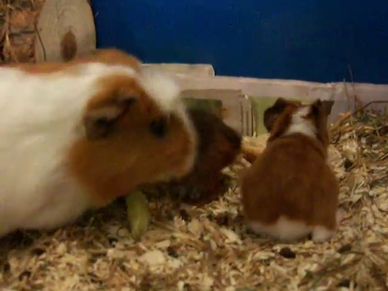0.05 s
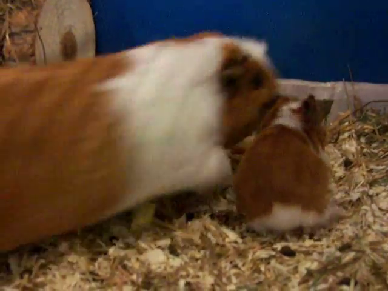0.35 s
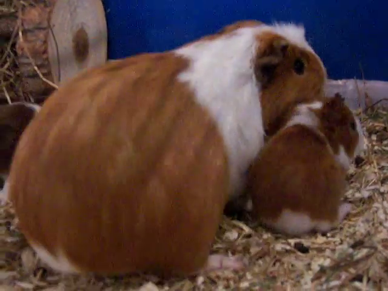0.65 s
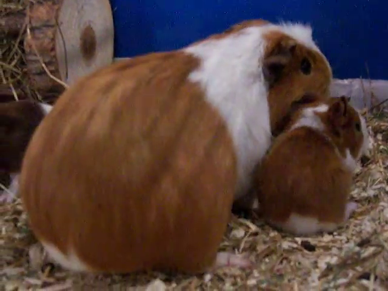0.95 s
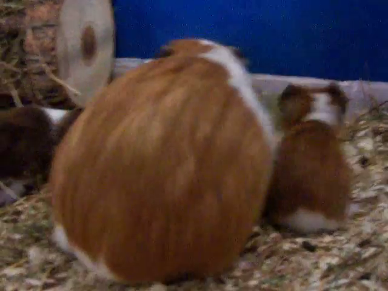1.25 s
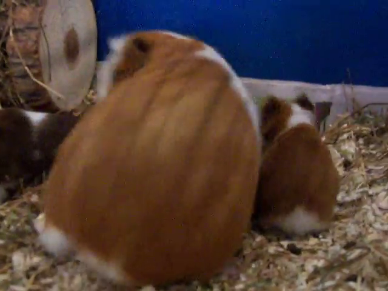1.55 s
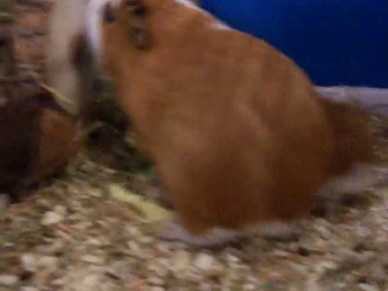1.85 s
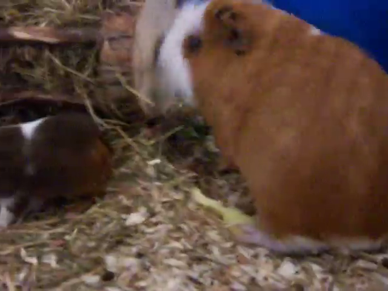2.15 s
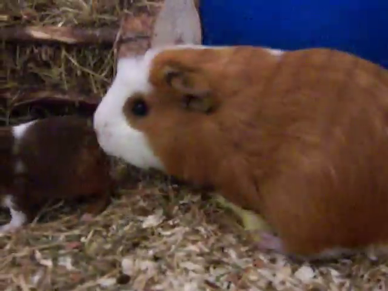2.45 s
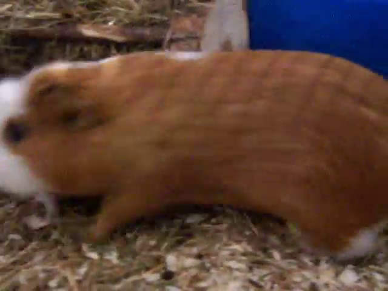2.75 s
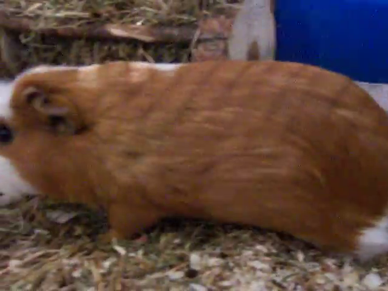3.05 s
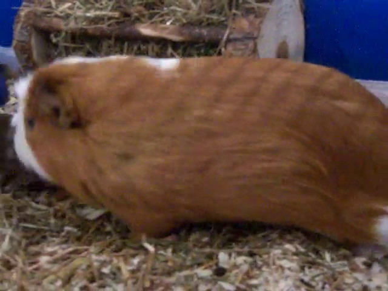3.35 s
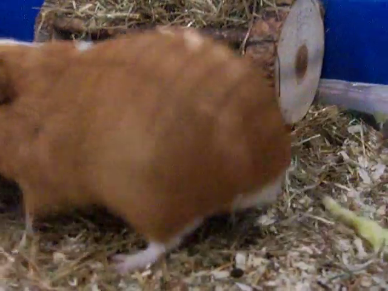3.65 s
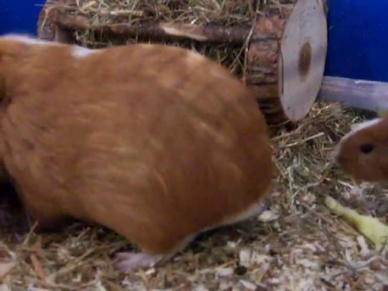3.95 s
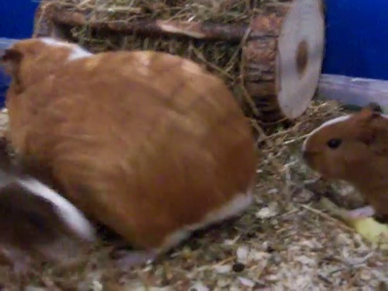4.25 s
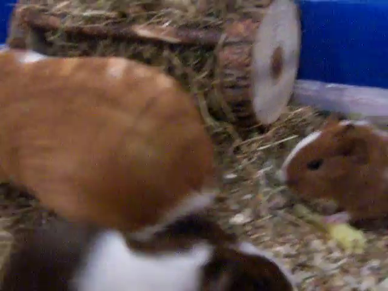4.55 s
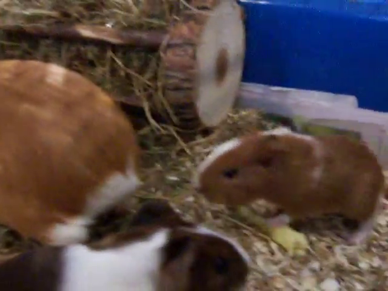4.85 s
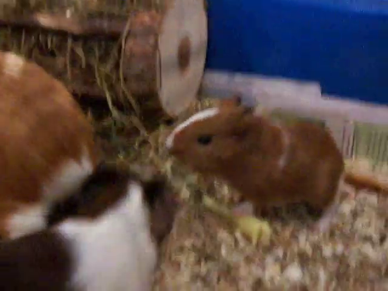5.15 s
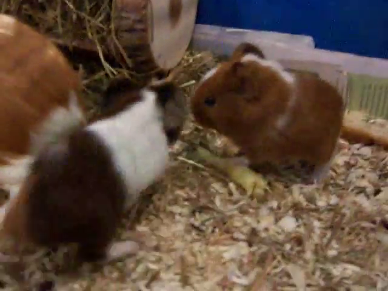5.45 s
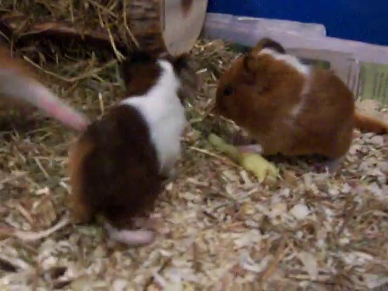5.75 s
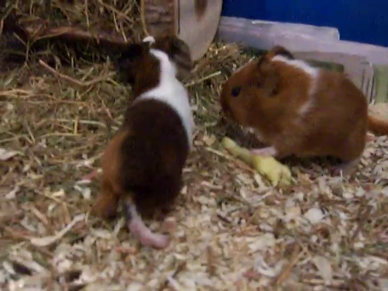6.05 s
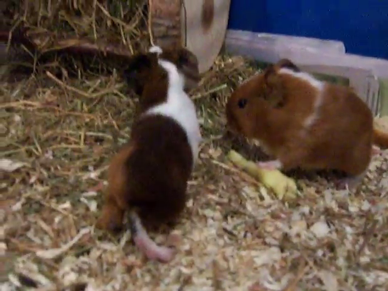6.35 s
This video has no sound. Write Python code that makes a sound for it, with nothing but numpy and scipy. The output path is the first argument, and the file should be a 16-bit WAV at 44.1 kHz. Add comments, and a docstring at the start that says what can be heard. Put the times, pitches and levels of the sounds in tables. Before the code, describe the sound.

Close to the microphone in an indoor cage, guinea pigs keep up an uneven chatter of short, low, buzzy calls. Wood shavings rustle and hay crackles in little bursts as they move, with scattered clicks of breaking stalks. A few thin whines slip in from about two seconds on. Underneath are a quiet electrical hum, hiss and room rumble, with low drones swelling and fading in the first half.

```python
"""Guinea pigs chut in an indoor cage, close to a small camera: quick clusters of tiny voiced syllables,
with a few longer whines. Their vocal folds vibrate to give a harmonic tone, roughened by turbulent breath.
Their feet and bellies push through wood shavings and hay, a crowd of tiny impacts and friction,
and now and then a dry stalk snaps. Cage and room add a short reverberation.
Behind them are mains hum, low drones that swell and fade, room rumble and microphone hiss."""
import sys
import numpy as np
from scipy import signal
from scipy.fft import rfft, irfft, next_fast_len
from scipy.io import wavfile
from scipy.ndimage import map_coordinates

SR = 44100
rng = np.random.default_rng(int(sys.argv[2]) if len(sys.argv) > 2 else 0)


def materialize(psi):
    """Save the field psi as 16-bit PCM at rate SR to the path in sys.argv[1].

    A 1-D psi becomes a single channel; in a 2-D psi each row is a channel.
    """
    bounded = np.clip(np.atleast_2d(psi).T, -1, 1)
    quanta = np.round(bounded * 32767).astype(np.int16)
    wavfile.write(sys.argv[1], SR, quanta)


N = 287532
T = np.arange(N) / SR


def amp(db):
    """Decibels to amplitude ratio."""
    return 10 ** (np.asarray(db) / 20)


def unit(x):
    """Normalise to rms 1."""
    return x / np.sqrt(np.mean(x ** 2) + 1e-20)


def along(points, hz):
    """Interpolate (frequency, value) points on a logarithmic frequency axis."""
    f, v = np.transpose(points)
    return np.interp(np.log(hz + 1), np.log(f + 1), v)


def wobble(rate, size=N):
    """Smooth random modulation: a spline through `rate` Gaussian knots a second."""
    knots = rng.standard_normal(int(size * rate / SR) + 4)
    return map_coordinates(knots, [1 + np.arange(size) * rate / SR])


def coloured(x, gain_db):
    """Zero-phase filtering by a gain in dB, given as a function of frequency."""
    m = next_fast_len(len(x) + 8192)
    return irfft(rfft(x, m) * amp(gain_db(np.fft.rfftfreq(m, 1 / SR))), m)[:len(x)]


def noise(spectrum, size=N):
    """Spectrally shaped Gaussian noise of rms 1."""
    return unit(coloured(rng.standard_normal(size), lambda hz: along(spectrum, hz)))


def gate(t, length, rise, fall):
    """A soft-edged envelope, half open at 0 and at length."""
    return (1 + np.tanh(t / rise)) / 2 * (1 - np.tanh((t - length) / fall)) / 2


def add(track, s, sound):
    """Superpose a sound on the track from time s on."""
    i = round(s * SR)
    part = sound[max(-i, 0):max(N - i, 0)]
    track[max(i, 0):max(i, 0) + len(part)] += part


# Mains harmonics: (frequency [Hz], rms level [dB])
HUM_PARTIALS = [(60, -56.5), (120, -59.5), (180, -63), (240, -66), (300, -67.5), (360, -69), (420, -75)]
def mains_hum():
    """A harmonic series on the mains frequency, each partial at a random phase."""
    partials = (amp(db) * np.sin(2 * np.pi * (hz * T + rng.random())) for hz, db in HUM_PARTIALS)
    return np.sqrt(2) * sum(partials)


# Swells of low tone: (centre time [s], half width [s], frequency [Hz], level at the centre [dB])
DRONE_SWELLS = [(.26, 0.087, 55.4, -45), (1.43, 0.2, 49, -40), (1.85, .35, 111.1, -50.5),
                (2.7, 0.68, 47.32, -39.5), (3.35, 0.36, 121.4, -56)]
def drones(waver_db=1.5, drift_rad=0.9, steepness=2.6):
    """Amplitude and phase modulation: low tones waver under bell-shaped envelopes."""
    out = np.zeros(N)
    for s, width, hz, db in DRONE_SWELLS:
        waver = amp(waver_db * wobble(3.0))
        tone = np.sqrt(2) * np.sin(2 * np.pi * hz * T + drift_rad * wobble(3.44))
        swell = 1 / (1 + np.abs((T - s) / width) ** steepness)
        out += amp(db) * swell * waver * tone
    return out


# Spectrum of the rumble: (frequency [Hz], relative spectral density [dB])
RUMBLE_SPECTRUM = [(10, -6.5), (20, 3), (30, 3), (42, 0), (60, -0.5), (80, -1.5), (120, -5.5), (200, -9),
                   (330, -15), (500, -17.5), (1000, -25), (2500, -38.5)]
# Course of the rumble: (time [s], level [dB])
RUMBLE_LEVEL = [(0, -46.5), (1.0, -47), (1.8, -44.5), (3.7, -46), (4.3, -47.5), (6.5, -46)]
def room_rumble(waver_db=1.17):
    """Ambient noise, strongest at low frequencies, with slight random amplitude modulation."""
    level_db = np.interp(T, *np.transpose(RUMBLE_LEVEL))
    return amp(level_db + waver_db * wobble(9)) * noise(RUMBLE_SPECTRUM)


# Spectrum of the hiss: (frequency [Hz], relative spectral density [dB])
HISS_SPECTRUM = [(200, -2), (1000, 2), (2000, 1.5), (4000, -1.5), (6500, -3), (7600, -5.5), (9000, -7.5)]
def microphone_hiss(level_db=-56):
    """Self-noise of the microphone: stationary and broadband."""
    return amp(level_db) * noise(HISS_SPECTRUM)


# Decay of cage and room: (frequency [Hz], reverberation time T60 [s])
ROOM_DECAY = [(200, 0.34), (1000, 0.11), (8000, 0.11)]
def reverberation(x):
    """Diffuse reflection from cage and room: convolution with exponentially decaying noise."""
    hz, t, spectra = signal.stft(rng.standard_normal(SR // 2), SR, nperseg=256)
    decay = amp(-60 * t / along(ROOM_DECAY, hz)[:, None])
    tail = signal.istft(spectra * decay, SR, nperseg=256)[1]
    delayed = np.pad(x, (SR // 300, 0))
    return signal.fftconvolve(delayed, tail / np.linalg.norm(tail))[:N]


def flakes(spectrum, size, contacts_per_s=2000, spread_db=3.3, slide=.55):
    """Shot noise of tiny contacts over the friction noise of sliding fur, at rms 1."""
    strengths = amp(spread_db * np.minimum(rng.exponential(size=size), 4)) * rng.standard_normal(size)
    contacts = unit(strengths * (rng.random(size) < contacts_per_s / SR))
    friction = slide * rng.standard_normal(size)
    return unit(coloured(contacts + friction, lambda hz: along(spectrum, hz)))


# Crunch of wood shavings: (frequency [Hz], relative spectral density [dB])
SHAVINGS_SPECTRUM = [(150, -29), (450, 9.5), (1200, 0), (2200, -1.5), (3000, -3), (4500, -12),
                     (8000, -22.5), (12000, -45.5)]
# Crackle of hay: (frequency [Hz], relative spectral density [dB])
HAY_SPECTRUM = [(300, -39), (2000, -9.5), (3600, -2), (5000, -2.5), (7500, -4), (9000, -5.5),
                (11000, -29.5)]
# Ground underfoot, shavings then drier hay: (time [s], crackle gain [dB], treble tilt [dB/octave])
UNDERFOOT = [(.5, -1, -4), (1.2, -4, -8), (1.9, -3, -0.5), (3.0, -0.5, 7), (3.65, 0, 6), (3.87, 0.5, -2.5),
             (4.2, 2, 8), (6.1, -8.5, 8)]
# Pushes through the bedding: (time [s], duration [s], level [dB])
PUSHES = [(0.312, 0.089, -57), (0.398, .1, -59), (0.534, 0.075, -53.5), (1.083, .16, -56.5),
          (1.249, 0.07, -61.5), (1.622, 0.12, -60), (1.762, 0.082, -57), (1.831, 0.045, -52.5),
          (1.878, 0.065, -58.5), (2.788, 0.087, -62), (3.483, 0.051, -56), (3.565, 0.15, -61),
          (3.647, 0.086, -54.5), (3.829, 0.056, -57), (4.121, .08, -61.5), (4.258, .04, -60.5),
          (4.34, 0.063, -55.5), (4.577, 0.1, -57), (5.196, .068, -60), (5.647, 0.047, -52.5),
          (5.733, 0.14, -54.5), (6.033, 0.11, -57)]
def bedding(crunch_db=2, crackle_db=0.5, clump_db=1.94, clumps_per_s=90, shuffles_per_s=1.5):
    """Granular noise: each push crunches shavings and crackles hay in clumps; dry hay is brighter."""
    out, t = np.zeros(N), np.arange(-SR // 20, SR // 4) / SR
    times, hay_db, hay_tilt_db = np.transpose(UNDERFOOT)
    shuffle_times = rng.uniform(0, N / SR, round(shuffles_per_s * N / SR))
    shuffles = [(s, .1, -72) for s in shuffle_times]  # faint shifts of weight
    for s, length, db in PUSHES + shuffles:
        tilt_db = np.interp(s, times, hay_tilt_db)
        hay = [(f, level + tilt_db * np.log2(max(f, 3000) / 6000)) for f, level in HAY_SPECTRUM]
        crunch = amp(crunch_db) * flakes(SHAVINGS_SPECTRUM, len(t))
        crackle = amp(crackle_db + np.interp(s, times, hay_db)) * flakes(hay, len(t))
        clumps = amp(clump_db * wobble(clumps_per_s, len(t)))
        envelope = gate(t, length, rise=0.005, fall=0.0096)
        add(out, s + t[0], amp(db) * clumps * (crunch + crackle) * envelope)
    return out


# Modes of a stalk: (frequency over its pitch [ratio], relative level [dB])
STALK_MODES = [(.44, -4), (.8, -11.5), (1, 2), (1.07, -8)]
# Dry stalks breaking: (time [s], level [dB], pitch [Hz])
STALK_BREAKS = [(0.255, -33.5, 4020), (1.382, -42, 3500), (1.764, -33, 5524), (1.923, -35.5, 5950),
                (2.86, -39.5, 4500), (4.618, -35.5, 3850), (5.814, -27, 1700), (6.114, -30.5, 6100),
                (6.145, -37.5, 3660)]
def stalk_snaps(t60=0.016, skirt_db_per_octave=6, crack_db=-10, ring_db=-14):
    """Brittle fracture: a burst of noise around the stalk's pitch, and a brief ring of its damped modes."""
    out, t = np.zeros(N), np.arange(SR // 25) / SR
    for s, db, pitch in STALK_BREAKS:
        burst = rng.standard_normal(len(t))
        crack = unit(coloured(burst, lambda hz: -skirt_db_per_octave * np.abs(np.log2((hz + 1) / pitch))))
        ring = sum(amp(level) * np.sin(2 * np.pi * ratio * pitch * t) for ratio, level in STALK_MODES)
        add(out, s, amp(db - 60 * t / t60) * (amp(crack_db) * crack + amp(ring_db) * ring))
    return out


# Turbulence in the throat: (frequency [Hz], relative spectral density [dB])
RASP_SPECTRUM = [(300, -23), (480, -3.5), (900, 9), (1100, -7.5), (1600, -17), (2500, -14.5), (5000, -34)]
def syllable(t, length, hz, overtone_db, throat, sag, rasp_db,
             jitter=0.094, shimmer_db=2.08, climb_hz_per_s=1950):
    """Source-filter voicing: sharp closures of the vocal folds add overtones, which the throat shapes."""
    arch = np.sin(np.pi * np.clip(t / length, 0, 1)) - 2 / np.pi  # zero mean over the syllable
    waver = jitter * amp(rasp_db) * wobble(266, len(t))  # a hoarse voice is less steady in pitch
    shimmer = amp(shimmer_db * wobble(300, len(t)))
    climb_hz = climb_hz_per_s * (np.clip(t, 0, length) - length / 2)
    pitch_hz = hz * (1 - sag * arch + waver) + climb_hz
    phase = 2 * np.pi * np.cumsum(pitch_hz) / SR
    k = np.arange(2, 14)  # harmonic numbers
    harmonics = np.cos(k[:, None] * phase + rng.normal(0, 1, (len(k), 1)))
    overtones = unit(amp(along(throat, k * hz)) @ harmonics)
    turbulence = unit(noise(RASP_SPECTRUM, len(t)) * (1 + np.cos(phase) / 2))  # one puff a cycle
    voiced = np.sqrt(2) * np.cos(phase) + amp(overtone_db) * overtones
    wave = (voiced + amp(rasp_db) * turbulence) / np.hypot(1, amp(rasp_db))
    return -wave * shimmer * gate(t, length, rise=0.00069, fall=0.001)


# Spectral envelope of a whine's overtones: (frequency [Hz], relative level [dB])
WHINE_ENVELOPE = [(1150, 5.5), (1750, -3), (2400, -9), (3500, -22), (8000, -35)]
# Longer squeaks: (time [s], duration [s], pitch [Hz], level [dB])
WHINE_CALLS = [(2.031, 0.026, 578, -50), (2.497, 0.052, 623, -52.5), (3.023, 0.022, 597, -49.5),
               (3.192, 0.025, 536, -50.5), (5.39, 0.044, 672, -55.5)]
def whines(t):
    """Frequency modulation: the pitch arches through a hoarse syllable with a strong second harmonic."""
    out = np.zeros(N)
    for s, length, hz, db in WHINE_CALLS:
        call = syllable(t, length, hz, overtone_db=0.5, throat=WHINE_ENVELOPE, sag=-.13, rasp_db=-2.5)
        add(out, s + t[0], amp(db) * call)
    return out


# Strength of the chuts' overtones: (time [s], level re the fundamental [dB])
CHUT_OVERTONES = [(.6, -17), (1.64, -29), (1.71, -5.5), (2.1, -24), (2.75, -3), (3.0, -26), (3.5, -9.5),
                  (4.5, -11.5), (5.3, -10)]
def chut_syllables(s, length, hz, db, spacing, close_db,
                   span_s=.055, close_s=0.0055, rest_hz=726.4, trail_db=-8.5, duller_db=3):
    """A pulse train: an opening syllable, then short, duller closing ones near the resting pitch."""
    overtone_db = np.interp(s, *np.transpose(CHUT_OVERTONES))
    close_hz = rest_hz * (hz / rest_hz) ** 0.22  # keeps part of the opening's interval from rest
    yield s, length, hz, db, overtone_db
    for k in range(int(span_s / spacing)):
        onset = s + (k + 1) * spacing
        yield onset, close_s, close_hz, db + close_db + k * trail_db, overtone_db - duller_db


# Spectral envelope of a chut's overtones: (frequency [Hz], relative level [dB])
CHUT_ENVELOPE = [(1250, 6.5), (1800, 1), (2450, -4), (3100, -13.5), (3700, -9.5), (5000, -26.5),
                 (8000, -33)]
# Chuts: (time [s], opening duration [s], opening pitch [Hz], opening level [dB],
# syllable spacing [s], first closing level re the opening [dB])
CHUT_CALLS = [ (.182, 0.014, 657, -47, 0.039, -6), (.36, 0.006, 609, -35, .027, -1),
              (.564, 0.021, 537, -38, 0.033, 4.5), (.822, 0.011, 651, -45, 0.035, -16),
              (.932, 0.0037, 540, -43.5, 0.033, -4.5), (1.013, 0.02, 671, -43.5, 0.029, -2),
              (1.251, 0.02, 600, -48.5, 0.031, 10.5), (1.448, 0.014, 657, -42.5, 0.034, 4),
              (1.638, 0.0074, 660, -43, 0.027, 1), (1.702, .011, 799, -41.5, .026, 1.5),
              (1.835, 0.0058, 640, -43.5, .016, 2.5), (1.88, 0.0164, 540, -45.5, .028, 1),
              (1.981, 0.012, 603, -33, 0.03, 0.5), (2.155, .017, 616, -43.5, 0.028, 3),
              (2.398, .007, 614, -48, .03, -13), (2.732, 0.012, 717, -45.5, 0.031, 1),
              (2.802, 0.0068, 414, -41, .022, -2), (3.003, .022, 770, -48, 0.021, -3),
              (3.492, 0.0068, 750, -44.5, 0.025, 0.5), (3.657, .022, 547, -43, 0.052, 1.5),
              (3.731, 0.013, 734, -44, 0.035, -16), (3.803, 0.011, 578, -38.5, .033, -12),
              (3.864, .016, 622, -40, 0.03, 3), (3.99, 0.016, 644, -52.5, .044, 5),
              (4.226, 0.0038, 745, -52.5, 0.025, 4.5), (4.35, .017, 623, -35.5, 0.04, -6),
              (4.522, 0.016, 613, -36, 0.038, -11), (4.784, .012, 618, -49, 0.038, 0),
              (5.042, 0.0095, 639, -45.5, .037, 1), (5.206, 0.013, 555, -42, 0.031, -1.5),
              (5.336, 0.015, 835, -45, 0.029, 3), (5.568, 0.019, 868, -52.5, 0.037, 5),
              (5.73, .019, 810, -43, .034, 2.5), (5.872, 0.011, 655, -48.5, .03, -14),
              (6.049, 0.0063, 590, -49, 0.029, -2.5)]
def chuts(t, medium_db=-40, medium_rasp_db=-11, medium_overtone_db=-16.5):
    """Vocal effort sets timbre: loud syllables are bright and clear, faint ones dull and hoarse."""
    out = np.zeros(N)
    pivot_hz = CHUT_ENVELOPE[0][0]
    for chut in CHUT_CALLS:
        for s, length, hz, db, overtone_db in chut_syllables(*chut):
            effort_db = db - medium_db
            richness_db = overtone_db - medium_overtone_db  # strong overtones bring more rasp
            rasp_db = min(medium_rasp_db - 0.89 * effort_db + 0.26 * richness_db, 0)
            throat = [(f, level + effort_db * np.log2(f / pivot_hz)) for f, level in CHUT_ENVELOPE]
            call = syllable(t, length, hz, overtone_db, throat, sag=0.055, rasp_db=rasp_db)
            add(out, s + t[0], amp(db) * call)
    return out


def scene(wet_db=-10):
    """Superposition of the animals' direct sound, their reverberation and the background, in mono."""
    background = mains_hum() + drones() + room_rumble() + microphone_hiss()
    syllable_t = np.arange(-SR // 200, SR // 18) / SR  # seconds from a syllable's onset
    animals = chuts(syllable_t) + whines(syllable_t) + stalk_snaps() + bedding()
    return (animals + amp(wet_db) * reverberation(animals) + background)[None]


# Response of the camera's microphone: (frequency [Hz], gain [dB])
MICROPHONE_RESPONSE = [(20, 0), (6810, 0), (6900, -14), (6990, 0), (7550, 0), (8000, -6), (8450, -13.5),
                       (8700, -21), (8900, -31)]
def record(dry, limit_hz=8950):
    """Linear filtering: the camera has a narrow treble notch and keeps nothing above its band limit."""
    def gain_db(hz):
        return along(MICROPHONE_RESPONSE, hz) - 120 * (hz > limit_hz)
    return np.array([coloured(x, gain_db) for x in dry])


dry = scene()
out = record(dry)
materialize(out)
```